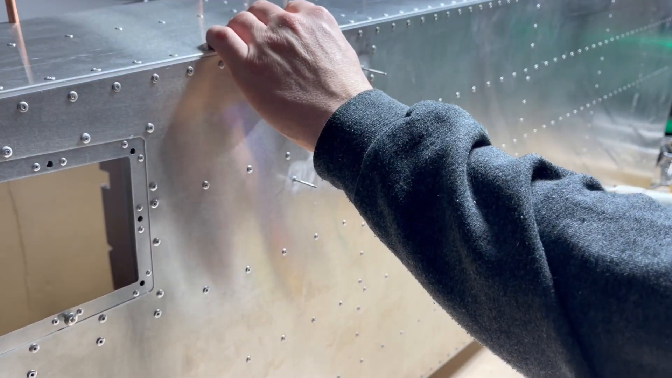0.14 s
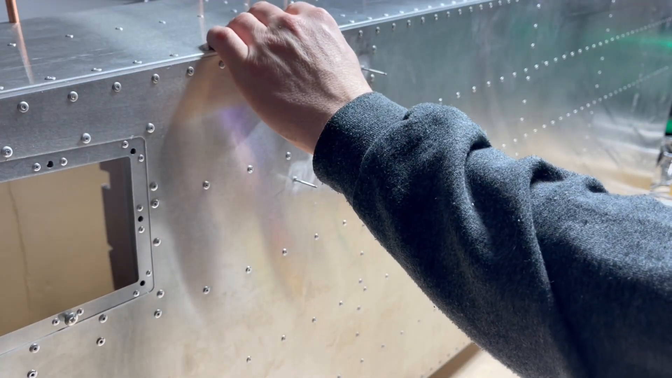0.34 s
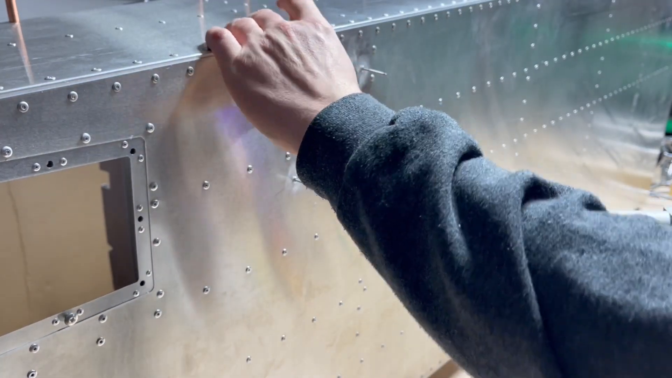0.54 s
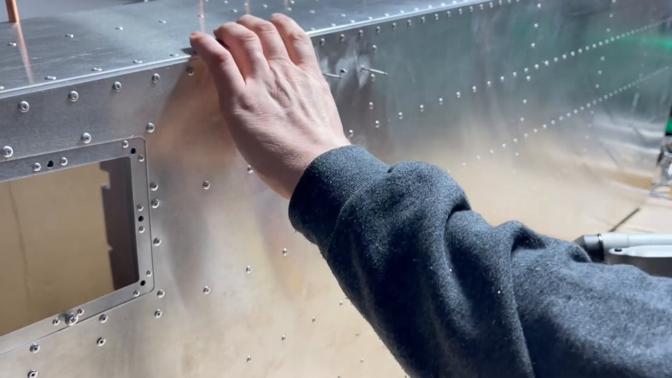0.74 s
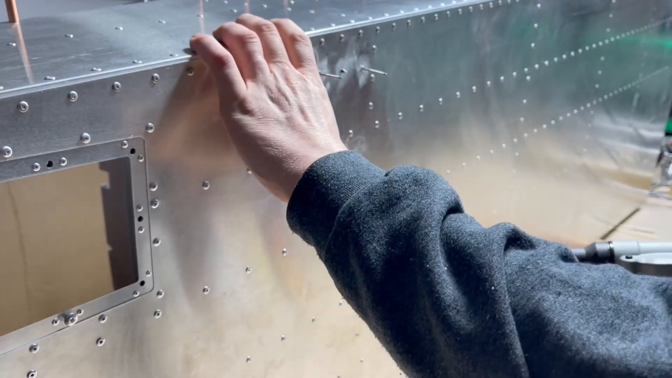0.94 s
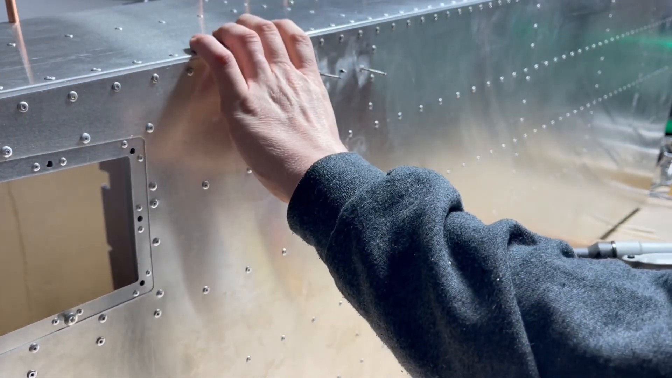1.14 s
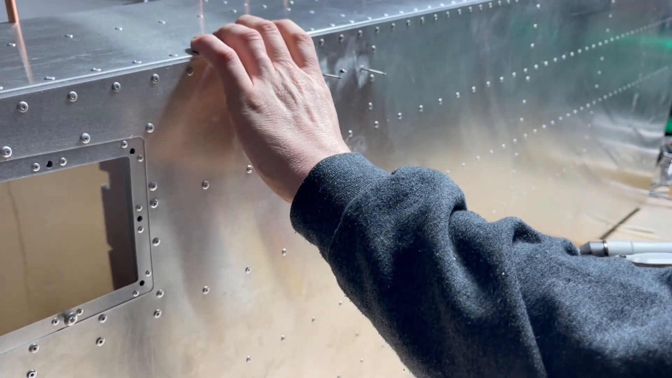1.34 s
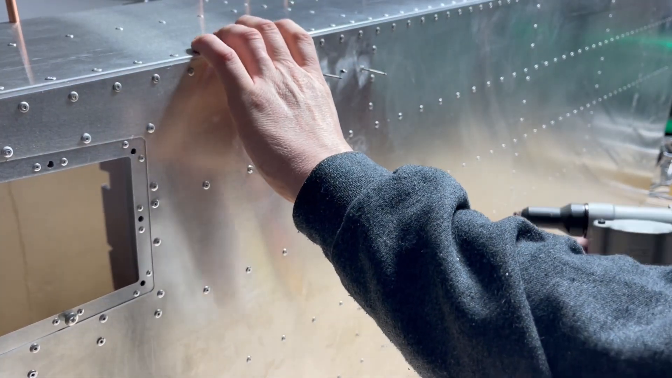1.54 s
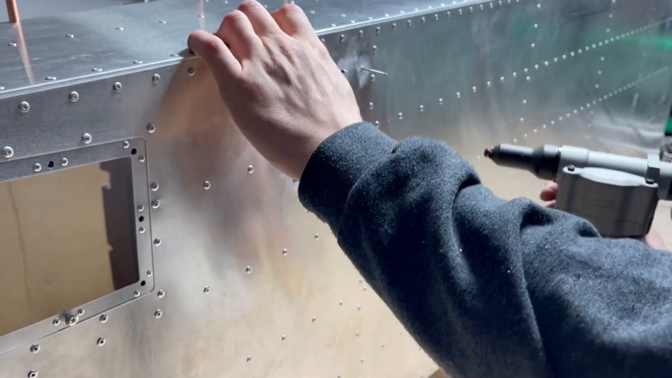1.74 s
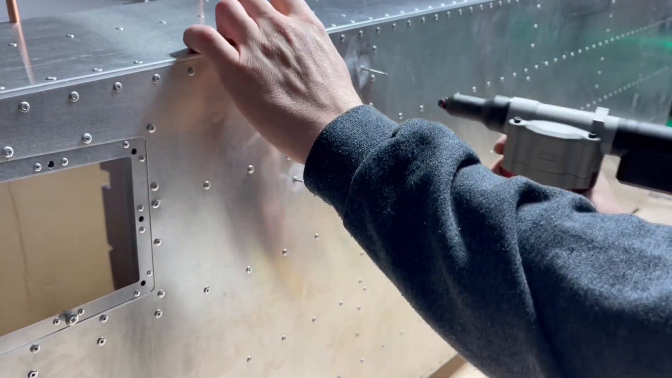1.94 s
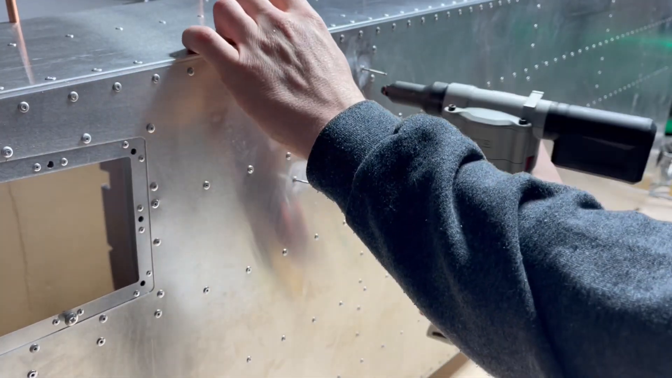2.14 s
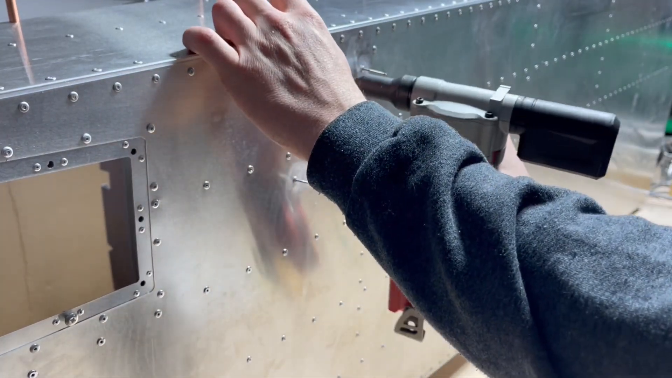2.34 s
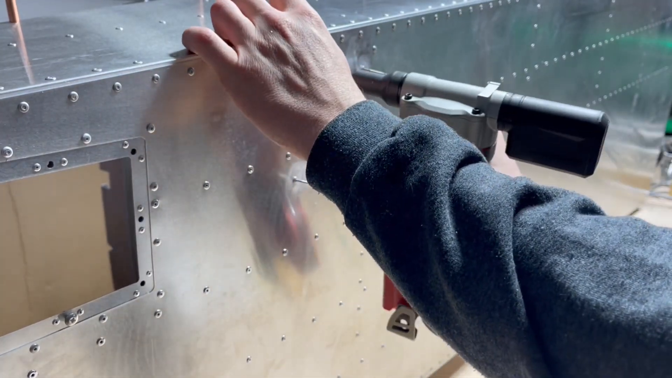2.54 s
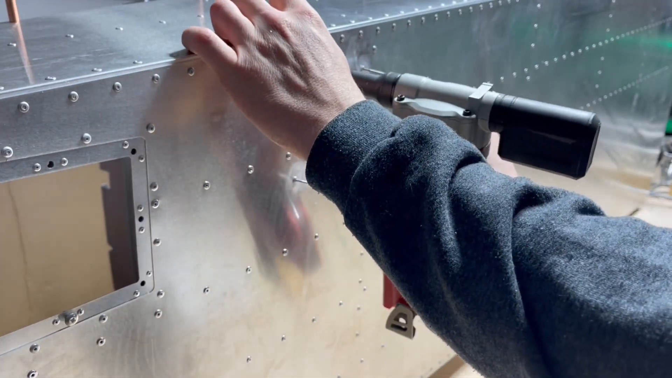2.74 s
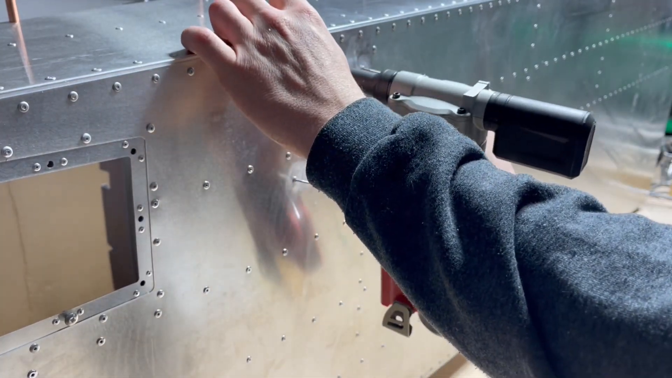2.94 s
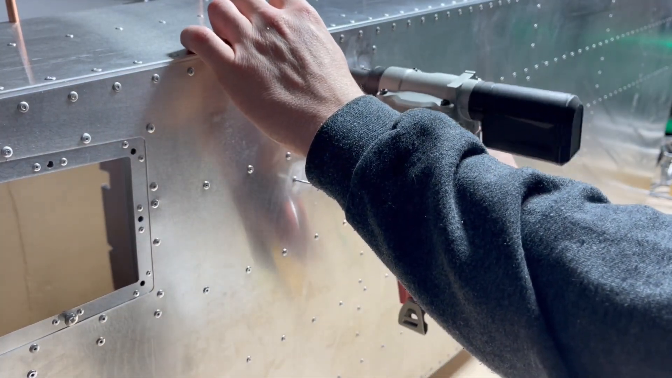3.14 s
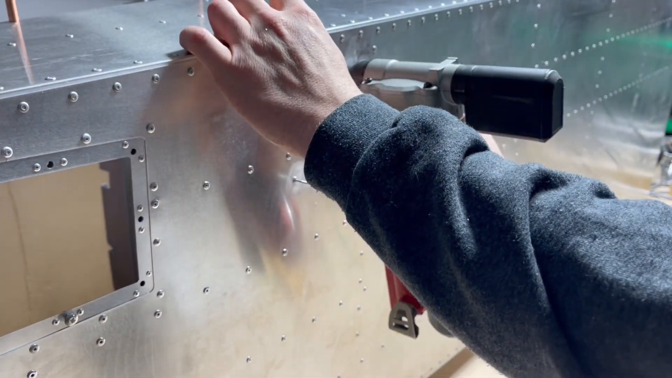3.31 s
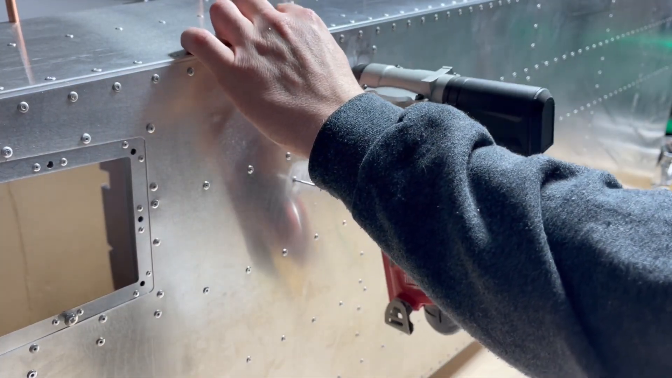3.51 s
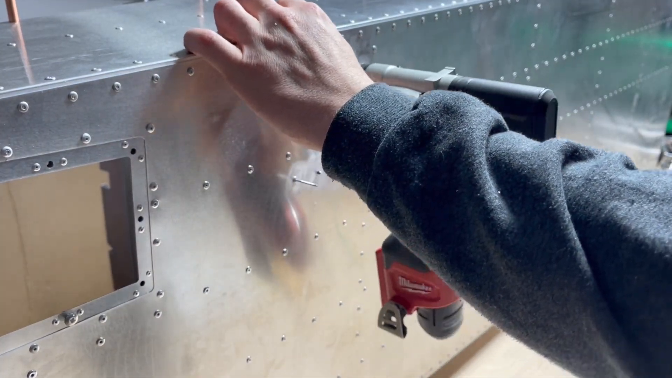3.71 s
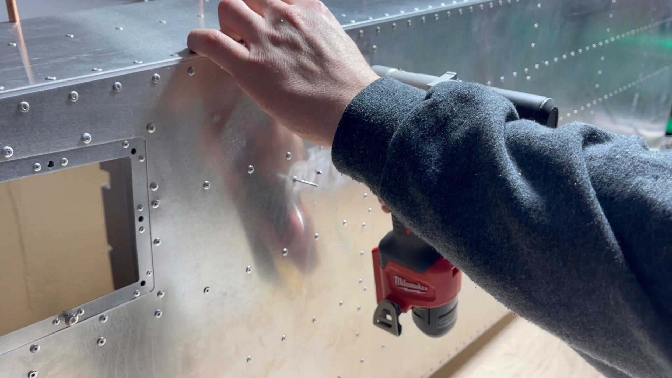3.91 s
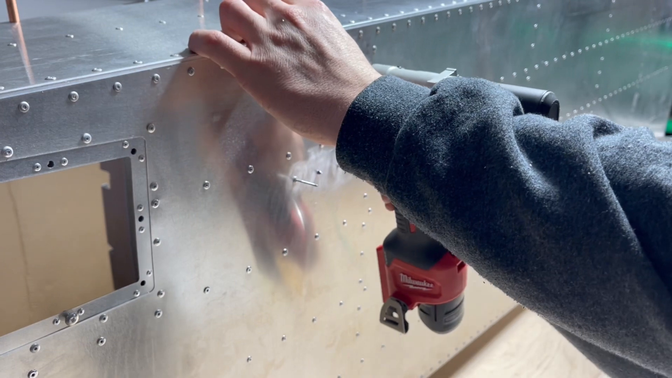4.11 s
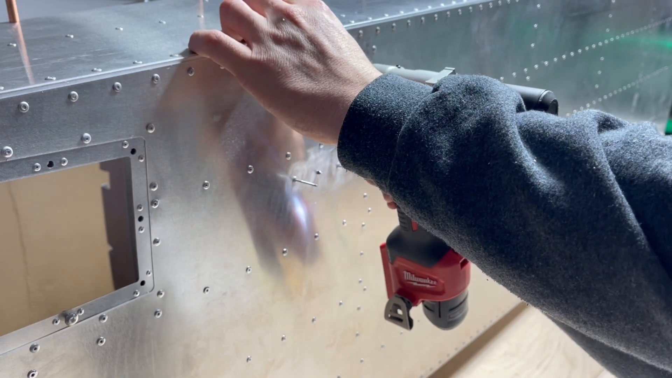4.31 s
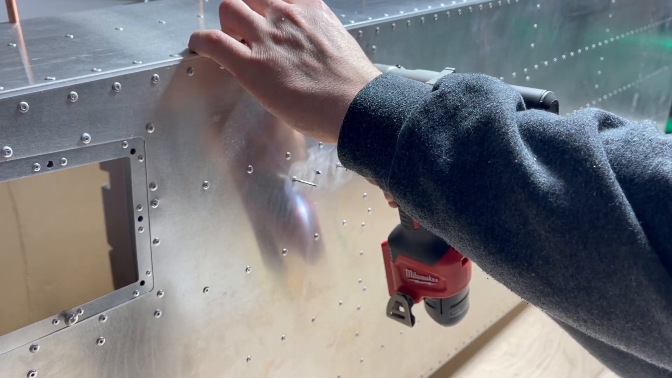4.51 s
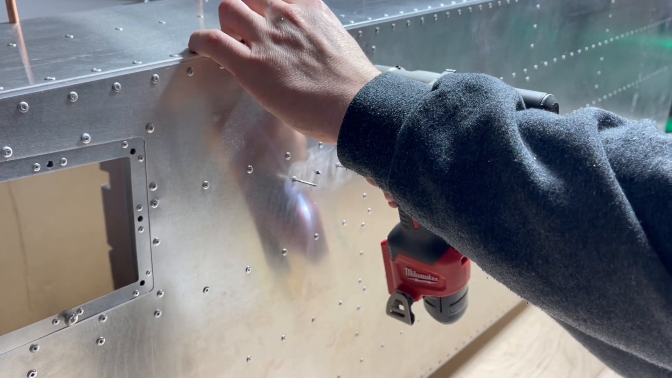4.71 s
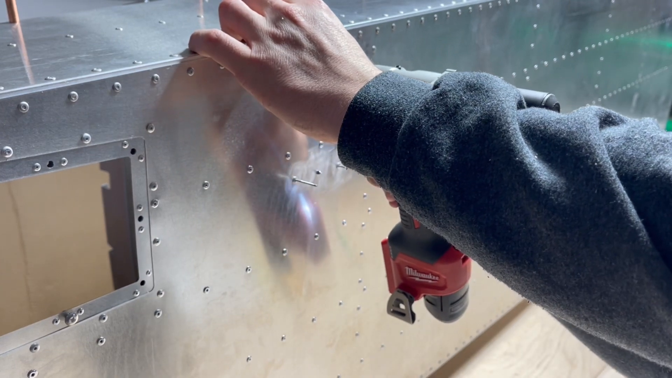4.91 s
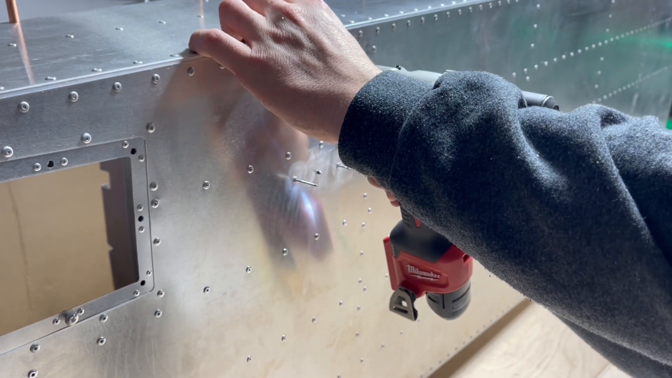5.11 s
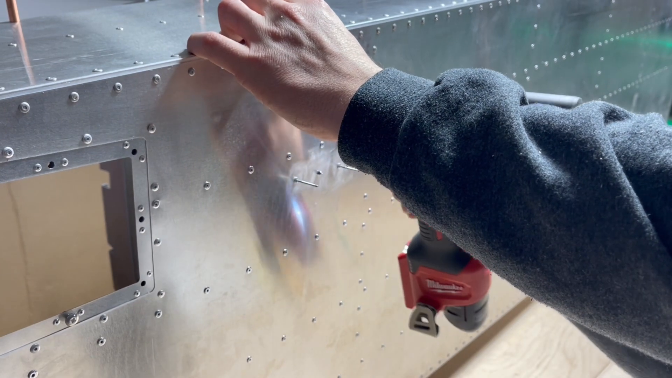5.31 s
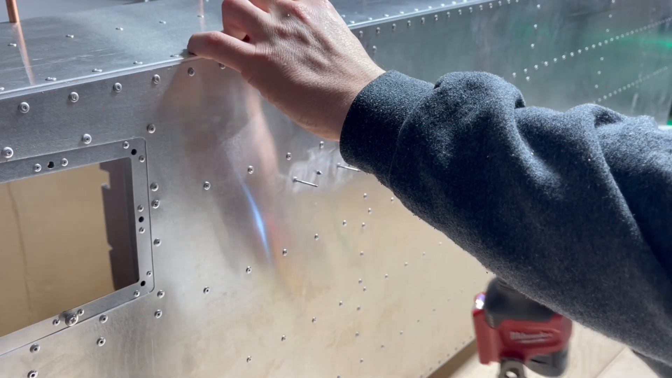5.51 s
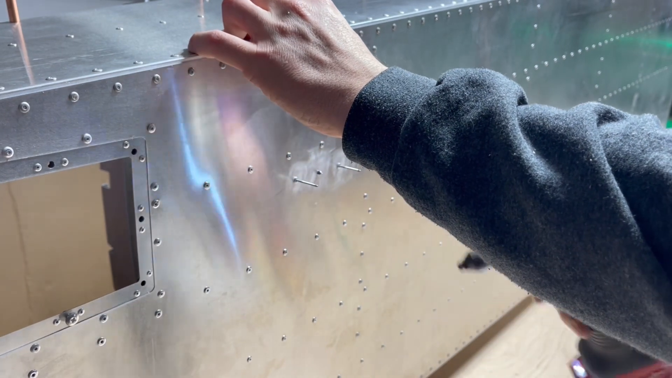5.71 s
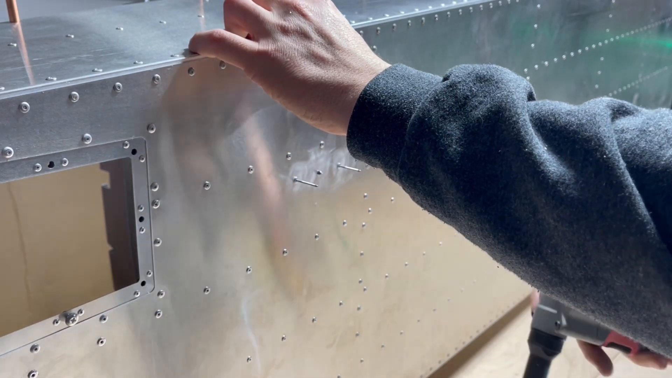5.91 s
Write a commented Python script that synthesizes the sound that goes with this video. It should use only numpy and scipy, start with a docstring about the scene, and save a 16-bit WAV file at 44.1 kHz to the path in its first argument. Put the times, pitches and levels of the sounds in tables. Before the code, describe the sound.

Close stereo view of a thin aluminium panel in a humming workshop. Quick bright steel ticks and sleeve rubs come first, then near quiet. A rivet knocks softly, scrapes into its hole and seats with a low thump. After a pause a cordless rivet tool spins up, labours and grinds through the sheet, and snaps loudly. It stops briefly, then whirs back with a thin singing whine until the end.

```python
"""A hand and sleeve brush an aluminium sheet close to a stereo pair in a humming workshop; small steel ticks.
A blind rivet then knocks about on the sheet, scrapes into its hole and seats with a thump.
A cordless rivet tool spins up and pulls, the load grows, the sheet grinds, and the mandrel snaps.
The tool stops, then winds back, singing, to the end. Gears are patterns read at the mesh rate,
the sheet is a bank of ringing modes, and friction and air are shaped noise."""
import sys
import numpy as np
from scipy import signal
from scipy.fft import rfft, irfft, next_fast_len
from scipy.io import wavfile
from scipy.ndimage import map_coordinates

SR = 44100
rng = np.random.default_rng(int(sys.argv[2]) if len(sys.argv) > 2 else 0)


def store_pcm(level_fs):
    """Save levels as 16-bit WAV."""
    pcm = np.round(np.clip(level_fs, -1, 1) * 32767).astype(np.int16)
    wavfile.write(sys.argv[1], SR, np.atleast_2d(pcm).T)


N = 262395
TIME = np.arange(N) / SR
BINS = np.maximum(np.arange(N + 1) * SR / (2 * N), 1)

# Levels in the tables are relative, before the trims in the functions and the room.
# The motor's two runs: switched on (s), braked (s; the second lies past the end), unloaded gear mesh (Hz)
PULL_ON_S, PULL_BRAKE_S, PULL_MESH_HZ = 4.351, 5.222, 845
RETURN_ON_S, RETURN_BRAKE_S, RETURN_MESH_HZ = 5.302, 6.0, 826
SPIN_UP_S, BRAKE_S, INERTIA_S = 0.275, 0.05, 0.035
# The jaws grip the mandrel; full load would lower the mesh rate by this share
GRIP_S, LOAD_SAG = 4.66, 0.08
# Gear and hiss levels at free speed, what full load adds to each, and the power of speed they follow
PULL_GEAR_DB, PULL_HISS_DB = -34.5, -34.5
RETURN_GEAR_DB, RETURN_HISS_DB = -37.5, -37.5
LOAD_GEAR_DB, LOAD_HISS_DB, SPEED_POWER = 1, 10.5, 1.28
# The gears and hiss of the pull are quieter once the snap has freed the tool from the rivet
FREED_DB = -4
# The tool is drawn back: from when, how fast all of it fades, how much faster its whines fade
WITHDRAW_S, WITHDRAW_DB_PER_S, WHINE_FADE_DB_PER_S = 5.52, 0.5, 22
# Tone of the pulling motor. Each row: frequency in Hz, level in dB
PULL_TONE = [(600, -5), (1100, -8), (1700, -5), (2300, 4), (3300, 0), (4500, -15), (7000, -14), (8800, -9),
             (12000, -6), (16000, -31)]
# Tone of the returning motor. Each row: frequency in Hz, level in dB
RETURN_TONE = [(500, -11), (1300, -10), (1900, 1), (2300, -1.5), (3100, 1.5), (4600, -16), (7000, -15.5),
               (8600, -12), (11700, -10.5), (16000, -36)]
# Whines of the gear stages. Each row: multiple of the mesh rate, level pulling in dB, level returning in dB
GEAR_WHINES = [(1, -7.5, -12.5), (2.55, -15.5, -35), (3.3, -10, -10), (3.72, -9.5, -2), (3.98, -11, -31),
               (9.65, -32, -23), (10.27, -35, -17.5), (11.2, -28, -11)]
# Pitch the unloaded screw sings at. Each row: time in seconds, frequency in Hz
SING_PITCH = [(5.44, 1947), (5.48, 1994), (5.544, 1896), (5.706, 1946), (5.756, 1618), (5.862, 1672),
              (5.95, 1932)]
SING_DB = -39
# The rivet's body yields and grinds until the snap; the running tool alone shakes the sheet less
YIELD_S, GRIND_ATTACK_S, GRIND_RELEASE_S = 4.725, 0.036, 0.0093
GRIND_DB, SHAKE_DB = -27.5, -49
# The sheet drones as the rivet's head spreads and as the puller ends its travel.
# Each row: start in seconds, length in seconds, level in dB
SHEET_DRONES = [(4.6, 0.081, -42), (4.68, 0.13, -29.5), (5.15, 0.1, -39)]
DRONE_ATTACK_S, DRONE_RELEASE_S = 0.016, 0.12
# The mandrel's fracture, then its rebounds. Each row: time in seconds, level in dB
SNAP_HITS = [(4.9885, -3), (4.9910, -10), (4.9930, -14), (5.0000, -11.5)]
SNAP_S = SNAP_HITS[0][0]
# Tone of the breaking mandrel. Each row: frequency in Hz, level in dB
SNAP_TONE = [(240, -18), (400, -1), (648, -1), (2400, -22), (2710, -38), (3940, -15.5), (8720, -10.5),
             (10200, -7.5), (11400, -8), (15500, -37), (16500, -47)]
# Rate of stick and slip in the hole. Each row: time in seconds, slips per second
SLIPS_PER_S = [(3.15, 345), (3.21, 315), (3.25, 286), (3.29, 295), (3.33, 280)]
# Tone of the metal round the hole. Each row: frequency in Hz, level in dB
SCRAPE_TONE = [(120, -47), (200, -7), (282, -6.5), (459, -17.5), (570, 0), (708, -14.5), (1090, -12),
               (1240, -16.5), (1430, -11), (1910, -21), (2700, -17), (3540, -31), (11600, -35.5),
               (15000, -95)]
# Shoves that work the rivet into its hole. Each row: start in seconds, length in seconds, level in dB
HOLE_SHOVES = [(3.15, 0.03, -41), (3.172, 0.044, -29), (3.236, 0.016, -24), (3.275, 0.04, -30.5)]
SHOVE_ATTACK_S, SHOVE_RELEASE_S = 0.0081, 0.032
# The rivet's tip scuffs while it finds the hole. Each row: start in seconds, length in seconds, level in dB
TIP_SCUFFS = [(2.605, 0.022, -38), (2.858, 0.024, -46), (3.003, 0.027, -46.5), (3.041, 0.011, -35),
              (3.105, 0.038, -39)]
SCUFF_ATTACK_S, SCUFF_RELEASE_S = 0.0027, 0.025
# Tone of the scuffs. Each row: frequency in Hz, level in dB
SCUFF_TONE = [(700, 6), (1500, -3), (2800, 2.5), (4200, -13), (12000, -24), (15000, -49)]
# Blows on the sheet. Each row: time in seconds, force in dB, upper cut-off of the contact in Hz
SHEET_BLOWS = [(2.61, -30, 229), (2.686, -39.5, 300), (2.872, -35, 217), (2.905, -34.5, 172),
               (3.057, -35.5, 420), (3.106, -35.5, 510), (3.317, -22.5, 245), (3.368, -37.5, 200),
               (4.055, -43, 490), (4.990, -19.5, 1080), (5.008, -27.5, 197), (5.204, -35.5, 445)]
# Modes of the aluminium sheet. Each row: frequency in Hz, level in dB, time to fall 60 dB in seconds
SHEET_MODES = [(88.16, -5, 0.89), (108, -1, 0.38), (149.4, -4, 0.23), (201.2, -7.5, 0.79),
               (291.8, -11.5, 0.35), (358, -15.5, 0.75), (508, -6, 0.31), (585, -23, .2),
               (648, -4.5, 0.045), (678.4, -4.5, 0.19), (764, -3.5, 0.15), (1061, -9, 0.093),
               (1235, -4, 0.042), (1540, -5, 0.08)]
# The sheet's dense small modes. Each row: frequency in Hz, level in dB
SHEET_WASH = [(30, -18), (50, -10), (90, -1), (250, -7), (420, -9), (650, -16), (1200, -35), (3000, -45)]
# Their decay. Each row: frequency in Hz, time to fall 60 dB in seconds
SHEET_WASH_T60 = [(60, 0.54), (250, 0.63), (700, 0.33), (3000, 1)]
# Light contacts of rivet, nose piece and trigger.
# Each row: time in seconds, level of the bright edge in dB, level of the duller clack in dB
STEEL_TICKS = [(0.0074, -35, -41.5), (0.0223, -26.5, -39), (0.068, -28, -40), (0.206, -38.5, -47),
               (0.29, -33, -42.5), (0.3198, -33, -45.5), (0.3526, -32.5, -41.5), (0.4302, -44, -48.5),
               (1.0101, -54, -48.5), (2.608, -64, -45.5), (2.6857, -44, -38), (3.2415, -40, -31.5),
               (3.31, -55, -35), (3.3362, -36.5, -53), (4.051, -56.5, -54), (4.297, -50, -59),
               (4.351, -37.5, -53), (5.3363, -41.5, -58)]
# Tone of the tick's edge, then of its clack. Each row: frequency in Hz, level in dB
EDGE_TONE = [(2000, -51), (4800, 5.5), (8500, 12), (12000, 12), (16000, -33)]
CLACK_TONE = [(400, -35), (1580, 11), (2000, 3), (2550, 0), (5000, -3.5), (12000, -29)]
# Sleeve and hand rub over the sheet. Each row: start in seconds, length in seconds, level in dB
HAND_RUBS = [(.008, .055, -40), (.066, 0.033, -34), (.105, .05, -46.5), (.208, 0.067, -45.5),
             (.285, 0.077, -43), (.39, .05, -53), (.535, 0.16, -56), (.72, .13, -66.5), (.865, 0.033, -61),
             (1.04, 0.013, -61), (1.583, 0.02, -53), (1.85, 0.043, -69), (3.42, 0.24, -65.5),
             (4.025, .06, -65.5)]
RUB_ATTACK_S, RUB_RELEASE_S = 0.0059, 0.02
# Tone of the rubbing. Each row: frequency in Hz, level in dB
RUB_TONE = [(900, -14), (1550, 15), (2000, 7), (2500, 5), (3300, 2.5), (8800, 7.5), (11800, 9),
            (15000, -40)]
# Machines in the shop. Each row: frequency in Hz, level in dB
MACHINE_HUM = [(86.1, -48.5), (150.7, -49), (166.9, -48), (220.7, -56), (242.2, -57), (339.1, -66)]
# A fan's whistle. Each row: frequency in Hz, width in Hz, level in dB
WHISTLE = [(959.6, 35, -56.5)]
# Tone of the moving air. Each row: frequency in Hz, level in dB
AIR_TONE = [(25, -24), (65, -3), (120, -3.5), (200, -11.5), (360, -18.5), (450, -20), (900, -21.5),
            (3000, -39), (6000, -54.5), (12000, -57), (15000, -92)]
AIR_LEVEL_DB = -46.5
# Left-right spread of the air. Each row: frequency in Hz, level in dB
AIR_SPREAD = [(60, -14), (250, -1), (1000, -0.5), (8000, -3.5)]
# Near reflections off the sheet and the arm: level, decay, lower edge
NEAR_DB, NEAR_T60_S, NEAR_LOW_HZ = -3, 0.016, 1410
# Tone of the room's tail. Each row: frequency in Hz, level in dB
ROOM_TONE = [(60, -26), (250, 0), (700, 8), (2500, -3), (5000, -2.5), (16000, 2.5)]
# Decay of that tail. Each row: frequency in Hz, time to fall 60 dB in seconds
ROOM_DECAY = [(100, 0.25), (1000, 0.43), (5000, 0.43), (14000, 0.25)]
# Shape of the level difference between the microphones.
# Each row: frequency in Hz, lean to the left in dB before it is scaled for each side
LEFT_LEAN = [(60, -1), (330, -1.5), (700, 3), (1300, 0.5), (4400, 4), (8000, 1), (15000, -1)]
# How far the right microphone lags behind the left. Each row: frequency in Hz, phase in radians
RIGHT_LAG = [(0, 0), (1720, 0.37), (3620, 0.76), (6800, 0.5), (7490, 1.9), (8790, -1.1), (9730, -1.5),
             (12300, -7), (13300, -8.5), (14400, -9.7), (14600, -12.6), (16500, -12.6)]
# Slight loss of treble at both microphones. Each row: frequency in Hz, level in dB
TREBLE_LOSS = [(1000, -0.11), (3000, -0.93)]
# Response of the microphone port. Each row: frequency in Hz, level in dB
PORT_TONE = [(9300, -1), (10200, -14), (11000, 3), (12500, -6), (13800, -16), (15200, -1.5)]
CUTOFF_HZ = 16000


def motor():
    """The motor spins up, sags under the pull, shakes the sheet through the rivet, brakes and reverses."""
    forward = spin(PULL_ON_S, PULL_BRAKE_S)
    reverse = spin(RETURN_ON_S, RETURN_BRAKE_S)
    load = mandrel_load()
    mesh_hz = PULL_MESH_HZ * forward * (1 - LOAD_SAG * load) + RETURN_MESH_HZ * reverse
    turns = np.cumsum(mesh_hz * (1 + 0.0035 * drift(16))) / SR
    pulling, returning = forward ** SPEED_POWER, reverse ** SPEED_POWER
    freed_db = FREED_DB * (TIME > SNAP_S)
    gear = pulling * from_db(PULL_GEAR_DB + LOAD_GEAR_DB * load + freed_db)
    hiss = pulling * from_db(PULL_HISS_DB + LOAD_HISS_DB * load + freed_db)
    away_s = np.maximum(TIME - WITHDRAW_S, 0)
    retreat_db = -WITHDRAW_DB_PER_S * away_s
    back_gear = returning * from_db(RETURN_GEAR_DB + retreat_db)
    back_hiss = returning * from_db(RETURN_HISS_DB + retreat_db)
    pull = stroke(gear_train(turns, rough_db=1.5), PULL_TONE, gear, hiss)
    back = stroke(gear_train(turns, rough_db=1.1), RETURN_TONE, back_gear, back_hiss)
    # without load the teeth only sing near full speed
    free_gear = back_gear * reverse ** 2 * from_db(-WHINE_FADE_DB_PER_S * away_s)
    whine = gear_whine(turns, mesh_hz, gear, free_gear)
    sing = from_db(SING_DB + retreat_db) * reverse * narrow_noise(in_time(SING_PITCH), width_hz=210)
    return pull + driven_sheet(pulling) + back + whine + sing


def spin(on_s, brake_s):
    """Share of free speed: a soft start, a steady run, a quick stop."""
    ramp = np.sin(np.pi / 2 * np.clip((TIME - on_s) / SPIN_UP_S, 0, 1)) ** 2
    return ramp * np.exp(-np.clip((TIME - brake_s) / BRAKE_S, 0, 20))


def mandrel_load():
    """Tension climbs evenly from the grip to the snap; the motor feels it through its inertia."""
    tension = np.clip((TIME - GRIP_S) / (SNAP_S - GRIP_S), 0, 1) * (TIME < SNAP_S)
    keep = np.exp(-1 / (INERTIA_S * SR))
    return signal.lfilter([1 - keep], [1, -keep], tension)


def gear_train(turns, rough_db):
    """Tooth contacts: a pattern that repeats with the gears, plus fresh rattle at every mesh."""
    teeth, size = 7, 512
    place = turns / teeth % 1 * size
    pattern = map_coordinates(rng.standard_normal(size), [place], order=3, mode="grid-wrap")
    rattle = rng.standard_normal(N) * (1 + 0.9 * np.cos(2 * np.pi * turns))
    return rms_one((pattern + rattle) * from_db(rough_db * drift(170)))


def stroke(drive, spectrum, gear_gain, hiss_gain):
    """Low-passed gearbox growl and high-passed motor hiss overlap in the treble, each with its own level."""
    sound = colour(drive, spectrum)
    gears = cut(sound, 7430, "low", order=4) / np.std(cut(sound, [1800, 4000], "band"))
    return gear_gain * gears + hiss_gain * rms_one(cut(sound, 5500, "high", order=4))


def gear_whine(turns, mesh_hz, gear, free_gear):
    """Each gear stage whines at its multiple of the mesh rate, with wavering level and phase."""
    whine = 0
    for multiple, pull_db, back_db in GEAR_WHINES:
        level = (from_db(pull_db) * gear + from_db(back_db) * free_gear) * from_db(2 * drift(38))
        whine = whine + level * np.sin(2 * np.pi * multiple * turns + 0.64 * drift(40))
    # the teeth press harder and whine louder while the motor gathers speed
    surge = np.clip(np.gradient(mesh_hz) * SR / 1500, 0, 1)
    return whine * from_db(5.5 * surge)


def driven_sheet(pulling):
    """The deforming rivet grinds at random and rattles the sheet, which also drones in two low tones."""
    grind = rng.standard_normal(N)
    ringing = rms_one(cut(skin(grind), 263, "high", order=3))
    growl = rms_one(cut(grind, [540, 700], "band"))
    yielding = swells([(YIELD_S, SNAP_S - YIELD_S, GRIND_DB)], GRIND_ATTACK_S, GRIND_RELEASE_S)
    grinding = yielding + from_db(SHAKE_DB) * pulling
    drone = narrow_noise(206, width_hz=9.7) + from_db(-3.5) * narrow_noise(287, width_hz=16)
    droning = swells(SHEET_DRONES, DRONE_ATTACK_S, DRONE_RELEASE_S)
    return grinding * (from_db(-2.5) * ringing + from_db(-5) * growl) + droning * drone


def snap():
    """The mandrel breaks and the jaws rebound; thin metal rings on."""
    out = 0
    for s, db in SNAP_HITS:
        out = out + excite(clicks([s], [db]), crack(SNAP_TONE, t60=0.015, ring_db=-8, ring_t60=0.21))
    return out


def scrape():
    """The rivet scuffs about, then sticks and slips against the edge of its hole."""
    turns = np.cumsum(in_time(SLIPS_PER_S) * (1 + 0.03 * drift(90))) / SR
    slips = np.diff(np.floor(turns), prepend=0) * rng.random(N)
    # grit dies away after each slip
    grit = rng.standard_normal(N) * np.exp(-2.5 * (turns % 1)) * (1 + 0.5 * np.tanh(drift(60)))
    friction = rms_one(slips - slips.mean()) + from_db(1.5) * rms_one(grit)
    # steady rubbing goes on between the slips; the metal round the hole colours both
    rasp = rms_one(colour(friction + from_db(2.5) * rng.standard_normal(N), SCRAPE_TONE))
    scuff = rms_one(colour(rng.standard_normal(N), SCUFF_TONE))
    shoving = from_db(1.5) * swells(HOLE_SHOVES, SHOVE_ATTACK_S, SHOVE_RELEASE_S)
    scuffing = from_db(-7.5) * swells(TIP_SCUFFS, SCUFF_ATTACK_S, SCUFF_RELEASE_S)
    return shoving * rasp + scuffing * scuff


def blows():
    """Pushes on the sheet: the softer the contact, the deeper the boom."""
    force = 0
    for s, db, hz in SHEET_BLOWS:
        force = force + cut(cut(clicks([s], [db]), hz, "low"), hz / 6, "high")
    wash = excite(force, burst(SHEET_WASH, SHEET_WASH_T60))
    return from_db(3.5) * skin(force) + from_db(34.5) * wash


def skin(force):
    """The sheet rings in its modes, each a two-pole resonator, with alternating sign."""
    out = 0
    for k, (hz, db, t60) in enumerate(SHEET_MODES):
        r, w = from_db(-60 / (t60 * SR)), 2 * np.pi * hz / SR
        mode = signal.lfilter([0, np.sin(w)], [1, -2 * r * np.cos(w), r * r], force + 1e-18)
        out = out + (-1) ** k * from_db(db) * mode
    return out


def ticks():
    """Small steel parts tap: a bright edge and a duller clack."""
    times, edge_db, clack_db = np.transpose(STEEL_TICKS)
    edge = crack(EDGE_TONE, t60=0.034, ring_db=-32, ring_t60=0.18)
    clack = crack(CLACK_TONE, t60=0.02, ring_db=-10.5, ring_t60=0.26)
    return excite(clicks(times, edge_db + 3.5), edge) + excite(clicks(times, clack_db + 7.5), clack)


def handling():
    """Cloth and skin catch and slip in fine grains on the sheet."""
    grains = rng.standard_normal(N) * from_db(1.5 * drift(210) + drift(17))
    rubbing = swells(HAND_RUBS, RUB_ATTACK_S, RUB_RELEASE_S)
    return from_db(-4.5) * rubbing * rms_one(colour(grains, RUB_TONE))


def shop():
    """Wavering machine hum, a fan's whistle and moving air, in stereo."""
    hum, whistle = 0, 0
    for hz, db in MACHINE_HUM:
        phase = 2 * np.pi * (hz * TIME + rng.random()) + 0.34 * drift(3.3)
        hum = hum + from_db(db + 1.13 * drift(3.1)) * np.sqrt(2) * np.sin(phase)
    for hz, width_hz, db in WHISTLE:
        both = np.array([narrow_noise(hz, width_hz), narrow_noise(hz, width_hz)])
        whistle = whistle + from_db(db) * both
    mid, side = colour(rng.standard_normal((2, N)), AIR_TONE)
    # long waves reach both microphones nearly alike
    side = colour(side, AIR_SPREAD)
    air = from_db(AIR_LEVEL_DB) * rms_one(mid + side * [[1], [-1]])
    return (hum + air) * from_db([[-0.4], [0.4]]) + whistle


def in_room(x, wet_db):
    """Direct sound from a little to the left, plus near and far reflections unrelated at each microphone."""
    tails = np.array([burst(ROOM_TONE, ROOM_DECAY), burst(ROOM_TONE, ROOM_DECAY)])
    tails = np.pad(tails, ((0, 0), (SR // 300, 0)))  # the room answers 1/300 s late
    t = TIME[:SR // 50]
    near = rng.standard_normal((2, len(t))) * from_db(-60 * t / NEAR_T60_S) * (t > 1 / 2000)
    near = cut(near / np.sqrt(np.sum(near ** 2, axis=1, keepdims=True)), NEAR_LOW_HZ, "high")
    both = x + from_db(NEAR_DB) * excite(x[None], near) + from_db(wet_db) * excite(x[None], tails)
    left, right = colour(both, TREBLE_LOSS)
    lag = np.interp(BINS, *np.transpose(RIGHT_LAG))
    right = irfft(rfft(right, 2 * N) * np.exp(-1j * lag))[:N]
    return np.array([colour(left, LEFT_LEAN, power=0.51), colour(right, LEFT_LEAN, power=-0.6)])


def from_db(db):
    """Decibels to gain."""
    return 10 ** (np.asarray(db) / 20)


def rms_one(x):
    """Scale to unit power."""
    return x / np.sqrt(np.mean(x ** 2) + 1e-20)


def in_time(rows):
    """A curve of (seconds, value) at every sample."""
    return np.interp(TIME, *np.transpose(rows))


def at_hz(points, hz):
    """Read a table on a log-frequency axis."""
    table_hz, values = np.transpose(points)
    return np.interp(np.log(hz), np.log(table_hz), values)


def colour(x, spectrum, power=1):
    """Shape a sound by a smooth spectrum."""
    size = next_fast_len(x.shape[-1] + 2000, True)
    hz = np.maximum(np.arange(size // 2 + 1) * SR / size, 1)
    return irfft(rfft(x, size) * from_db(power * at_hz(spectrum, hz)), size)[..., :x.shape[-1]]


def cut(x, hz, kind, order=2):
    """Butterworth filter."""
    sos = signal.butter(order, np.clip(hz, 5, 0.48 * SR), kind, fs=SR, output="sos")
    return signal.sosfilt(sos, x + 1e-18)


def drift(rate):
    """Smooth chance with spread 1, from two random knots per cycle of the rate in Hz."""
    knots = rng.standard_normal(N // 20)
    return rms_one(map_coordinates(knots, [TIME * rate * 2], order=3, mode="wrap"))


def narrow_noise(hz, width_hz):
    """A wavering tone around a pitch; rms 1."""
    phase = 2 * np.pi * np.cumsum(hz * np.ones(N)) / SR
    return rms_one(drift(width_hz / 2) * np.sin(phase) + drift(width_hz / 2) * np.cos(phase))


def swells(rows, attack_s, release_s):
    """Gain of strokes that each build up, hold and die away; overlapping strokes add in power."""
    power = 0
    for start, length, db in rows:
        rise = 1 - np.exp(-np.maximum(TIME - start, 0) / attack_s)
        fall = np.exp(-np.clip((TIME - start - length) / release_s, 0, 20))
        power = power + (from_db(db) * rise * fall) ** 2
    return np.sqrt(power)


def clicks(times, levels_db):
    """One impulse for each event."""
    out = np.zeros(N)
    out[np.round(np.asarray(times) * SR).astype(int)] = from_db(levels_db)
    return out


def excite(drive, response):
    """Play a drive through an impulse response."""
    return signal.fftconvolve(drive, response, axes=-1)[..., :N]


def burst(spectrum, t60s):
    """Noise that dies away octave by octave; unit energy."""
    t, out = TIME[:SR * 3 // 4], 0
    noise = colour(rng.standard_normal(len(t)), spectrum)
    for hz in 30 * 2.0 ** np.arange(10):
        band = cut(noise, [hz / np.sqrt(2), hz * np.sqrt(2)], "band")
        out = out + band * from_db(-60 * t / at_hz(t60s, hz))
    return out / np.sqrt(np.sum(out ** 2))


def crack(spectrum, t60, ring_db, ring_t60):
    """A sharp metal contact: coloured noise with a fast decay and a weaker, longer ring."""
    t = TIME[:SR // 2]
    envelope = from_db(-60 * t / t60) + from_db(ring_db - 60 * t / ring_t60)
    return rms_one(colour(rng.standard_normal(len(t)), spectrum)) * envelope / 2


def scene():
    """Tool and hand close by, the work on the sheet with a little more room, the shop all round."""
    tool_and_hand = in_room(motor() + handling(), wet_db=-6.5)
    sheet_work = in_room(snap() + scrape() + blows() + ticks(), wet_db=-4.5)
    return tool_and_hand + sheet_work + shop()


def record(dry):
    """The microphone port has notches in the treble; peaks are rounded and the top is cut."""
    heard = np.tanh(colour(dry, PORT_TONE))
    return signal.sosfilt(signal.ellip(10, 0.3, 80, CUTOFF_HZ, fs=SR, output="sos"), heard)


dry = scene()
out = record(dry)
store_pcm(out)
```